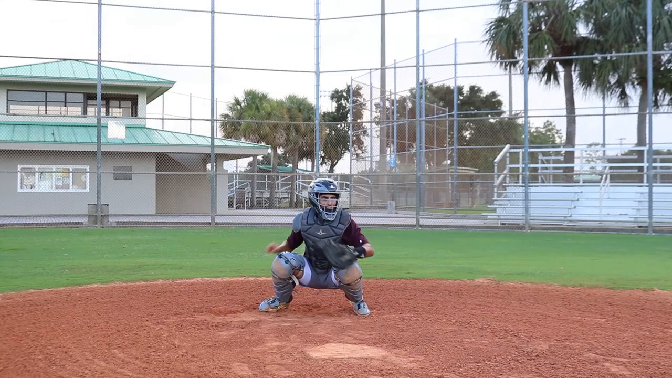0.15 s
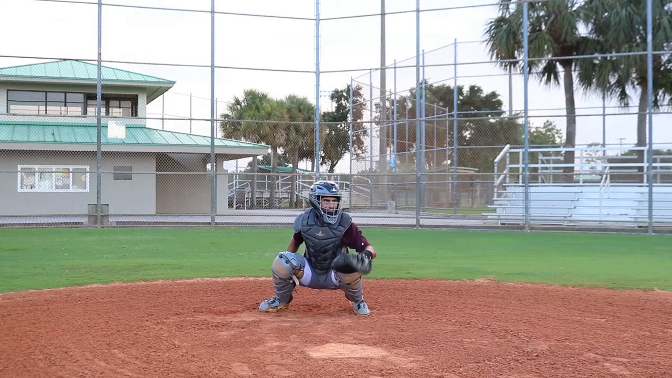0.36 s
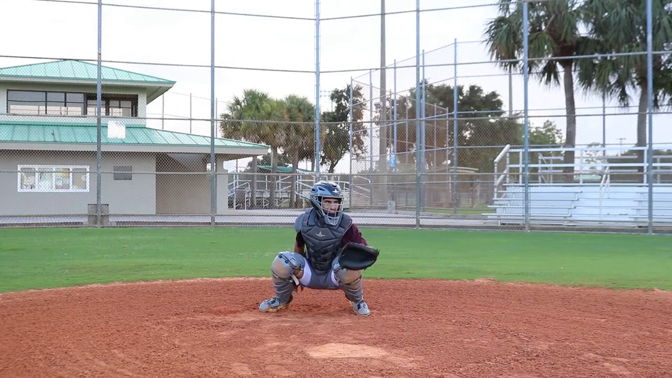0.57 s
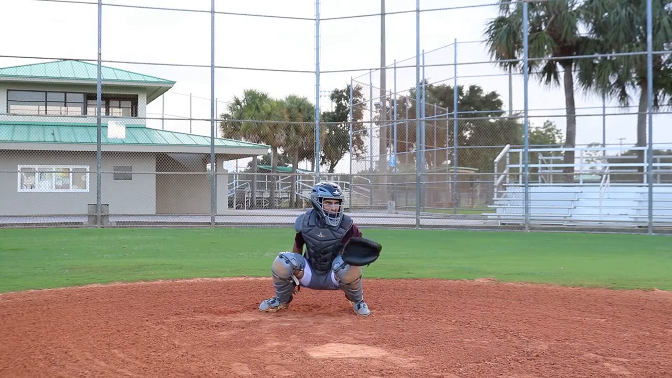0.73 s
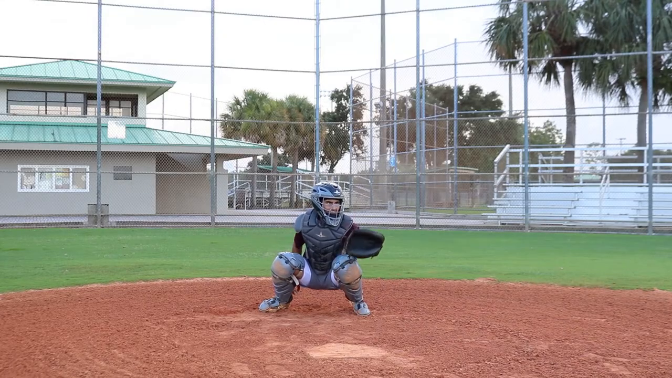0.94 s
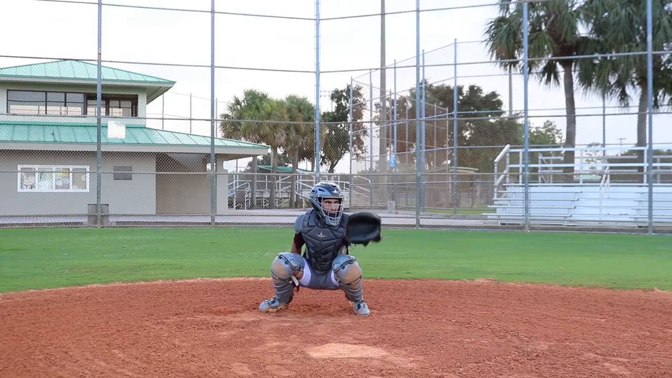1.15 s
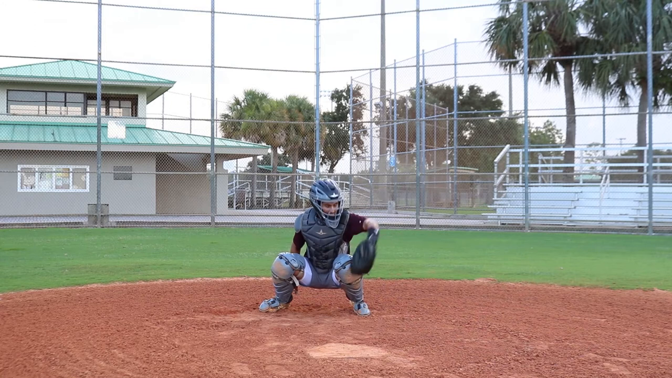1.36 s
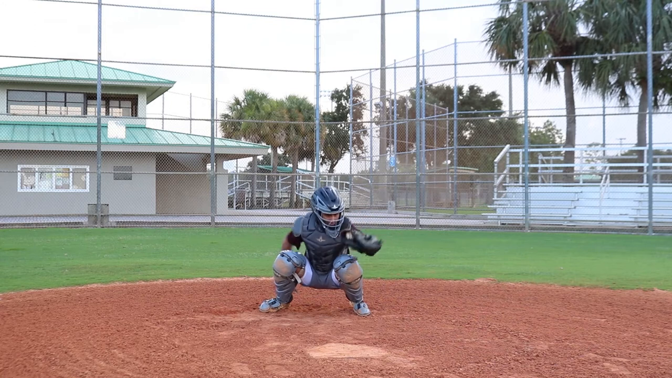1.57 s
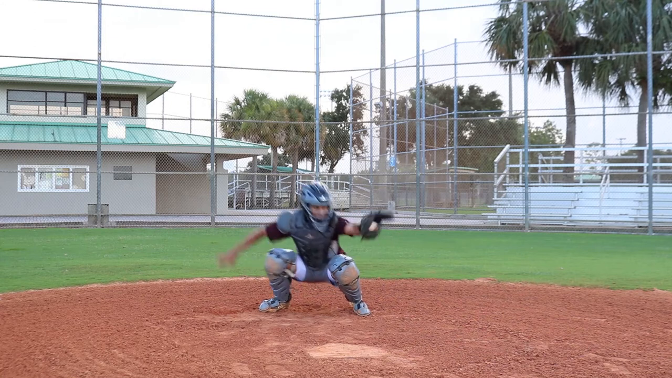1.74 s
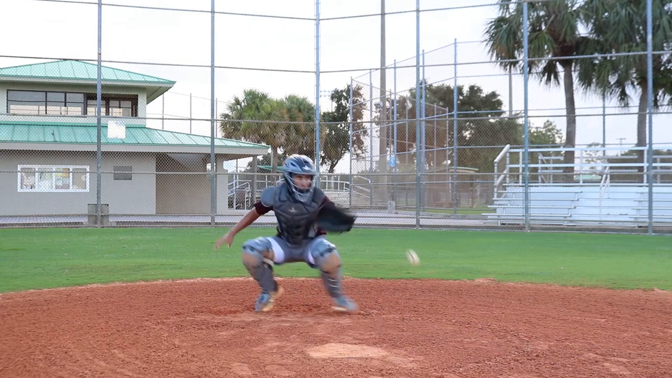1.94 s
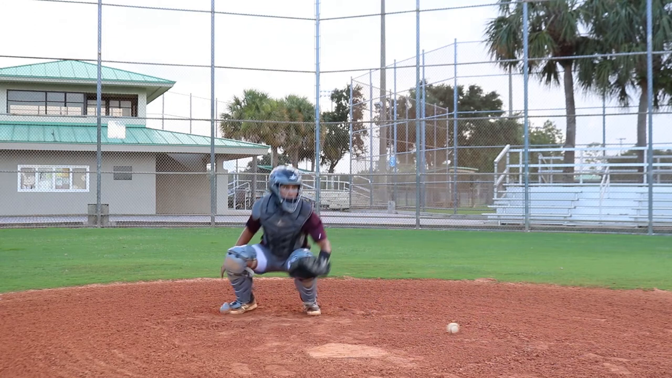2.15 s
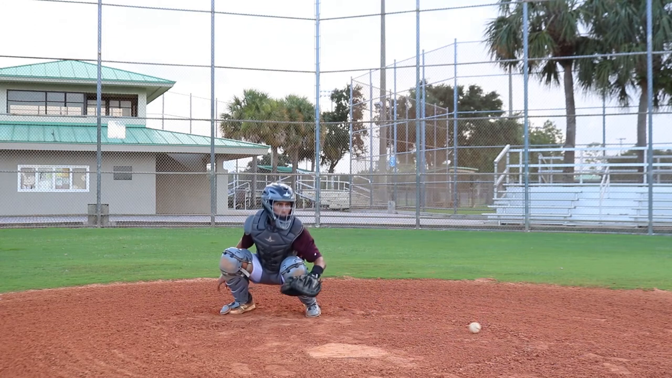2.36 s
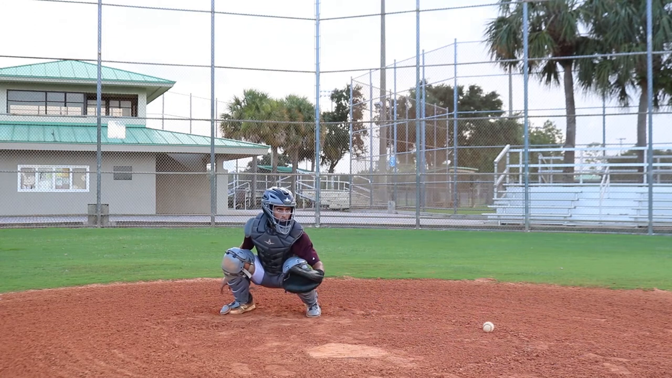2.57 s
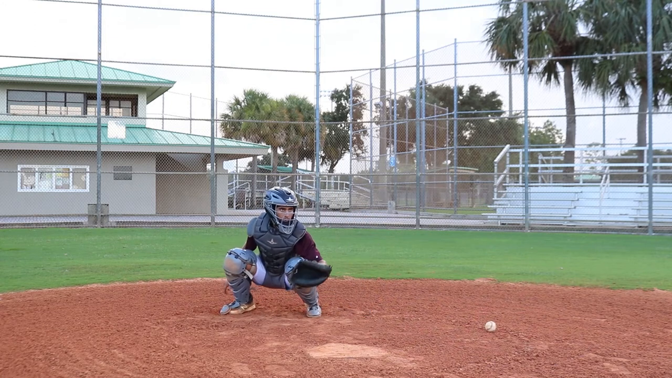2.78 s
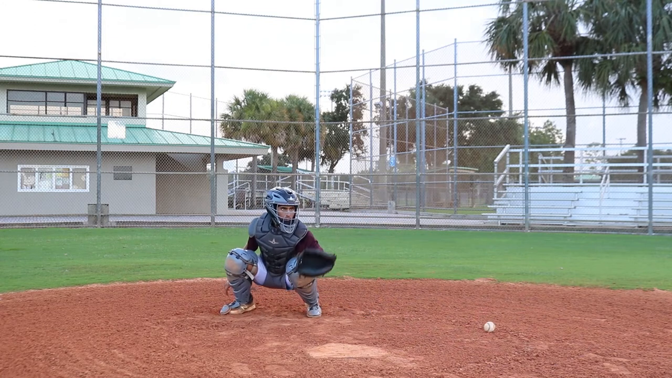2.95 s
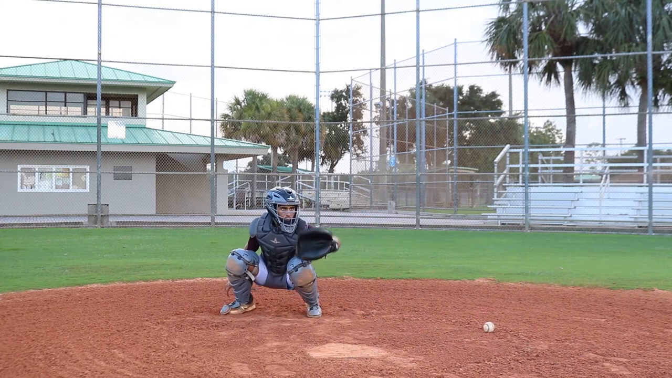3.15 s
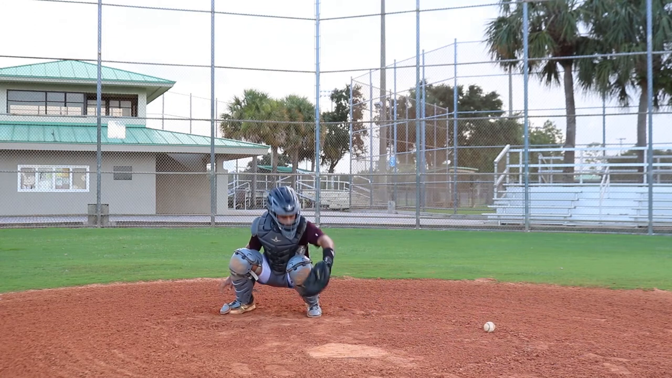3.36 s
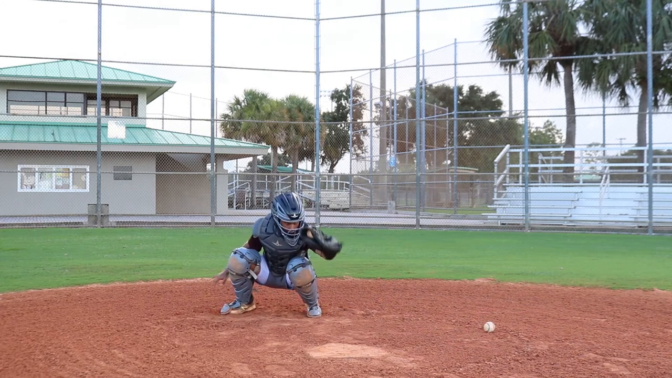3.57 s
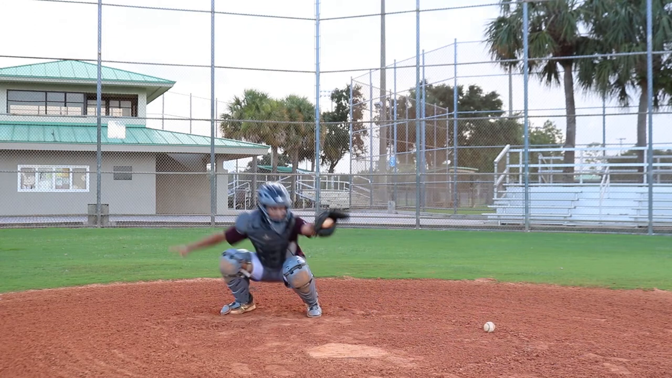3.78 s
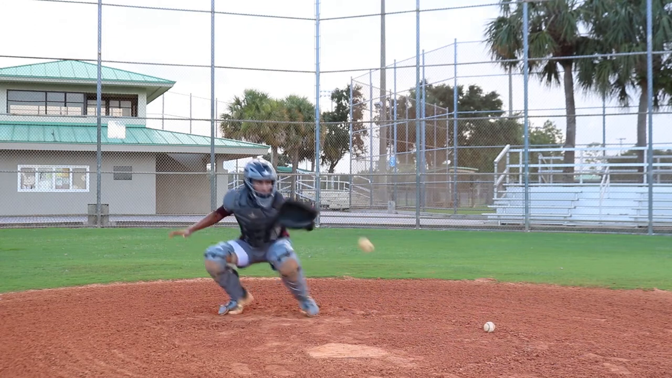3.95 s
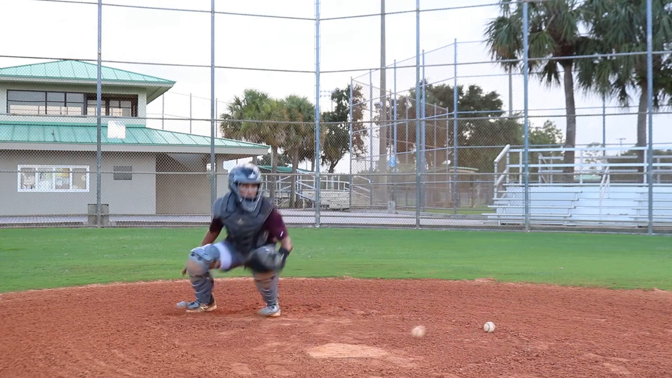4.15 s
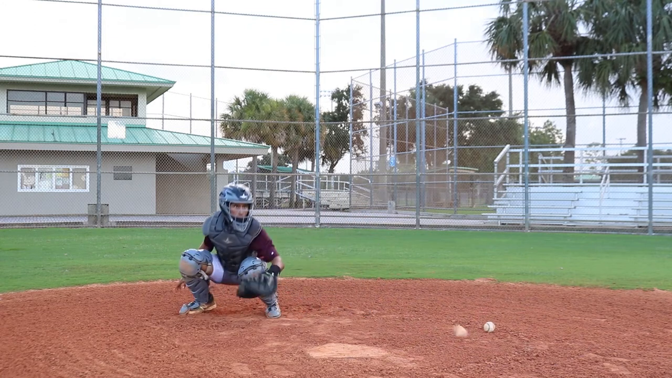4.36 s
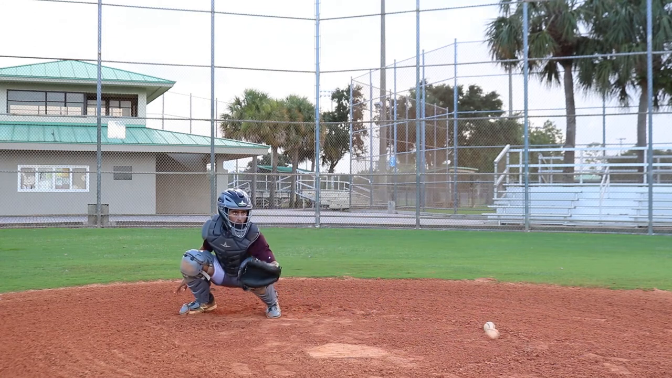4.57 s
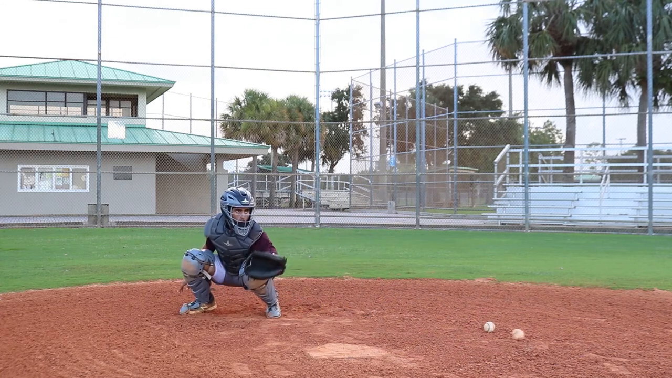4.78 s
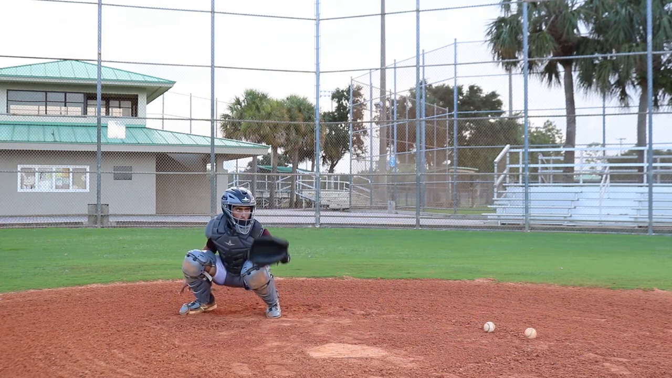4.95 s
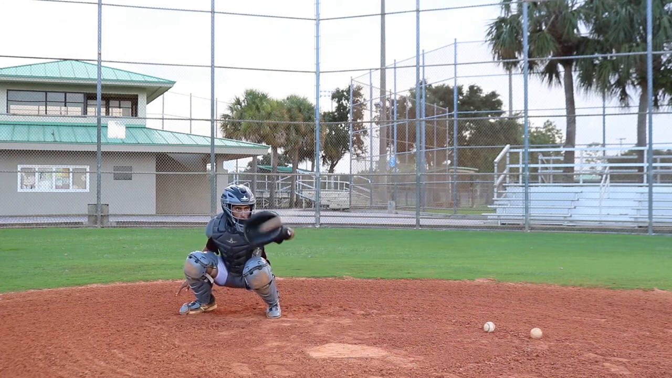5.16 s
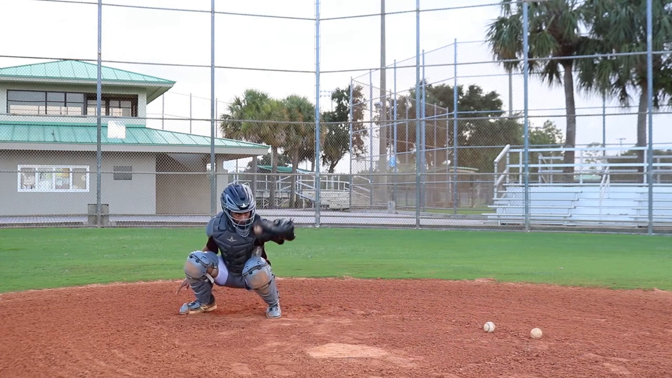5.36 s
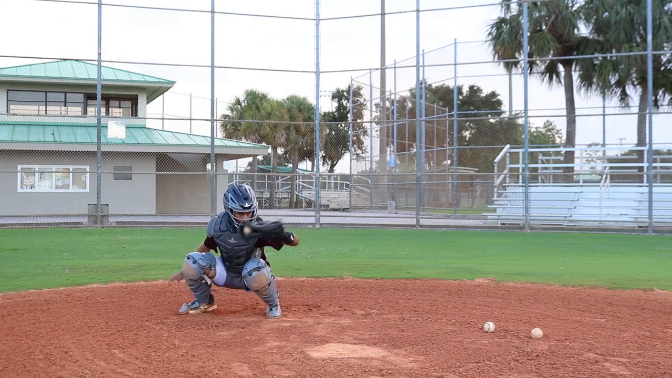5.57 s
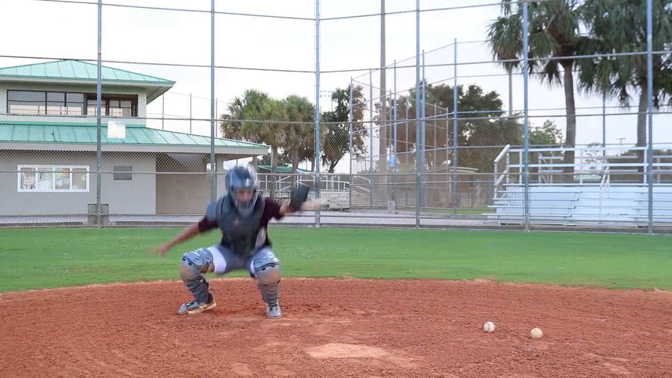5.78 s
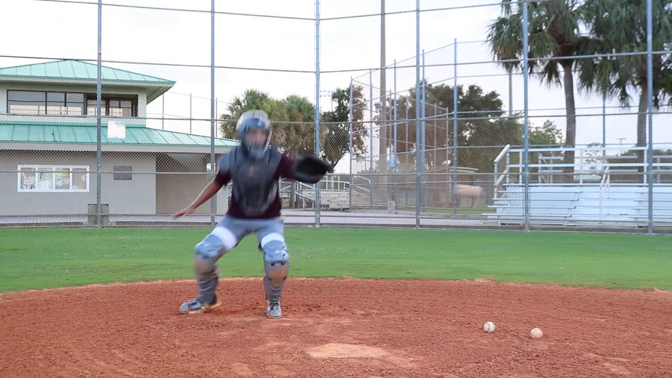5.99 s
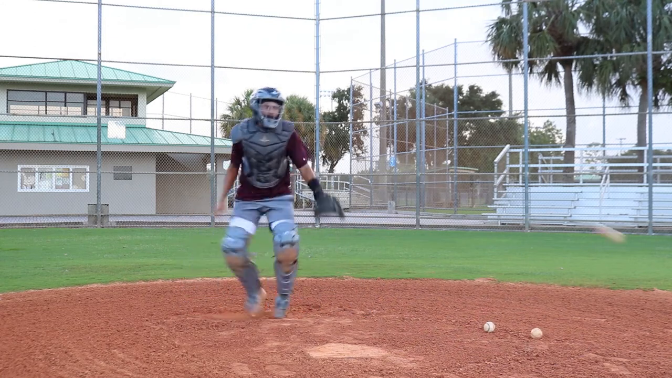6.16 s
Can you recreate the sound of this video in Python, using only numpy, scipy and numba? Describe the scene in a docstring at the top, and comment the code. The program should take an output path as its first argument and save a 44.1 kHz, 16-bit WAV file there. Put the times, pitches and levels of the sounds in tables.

```python
"""On an open ball field a small bird calls over distant traffic and a low rumble. A pitch hisses in and
pops in the catcher's mitt, overloading the microphone, whose limiter ducks; ground, fences and buildings
throw the pop back. His gear clicks and his feet thud and scuff on the clay. Two more pitches follow,
about two seconds apart; between them the bird calls again and he drops the ball. A last scuff ends it."""
import sys
import numpy as np
from scipy import signal
from scipy.fft import rfft, irfft
from scipy.io import wavfile
from numba import njit

SR = 44100
rng = np.random.default_rng(int(sys.argv[2]) if len(sys.argv) > 2 else 0)


def transcribe(signal):
    """Save signal, clipped to [-1, 1], as a 16-bit WAV file at the path in sys.argv[1]."""
    frames = np.atleast_2d(signal).T
    limited = np.clip(frames, -1, 1)
    pcm = np.round(limited * 32767).astype(np.int16)
    wavfile.write(sys.argv[1], SR, pcm)


N = 274302
T = np.arange(N) / SR

# catches: start_s, level_db, crack_db, leather modes set by where the ball lands (pitch_hz, level_db),
# sent_to_walls_db, rumble_hold_s
CATCHES = [ (1.3929, 2, 0, [(620, 4.5), (1290, 5), (1700, 5.5), (2150, 4), (2850, -1.5)], -4.5, 0.94),
           (3.3613, 2.6, -1, [(535, 2.5), (720, -8), (1700, 0), (2000, -1), (2450, 4.5), (2900, -1)],
           -1.5, 1.14), (5.246, 6, -2.5, [(500, -11), (930, 5), (1130, 2.5), (1590, 4.5), (2900, -7.5),
           (3900, -2)], -5.5, .42)]
# spectrum of sandy clay, also used for the bird's echo: frequency_hz, level_db
GRIT = [(1000, 4), (3000, -5.5), (5500, -4), (7000, -7), (8800, 0.5), (10500, -19), (13500, -12),
        (16000, -19)]


def undb(db):
    """Amplitude ratio of a level in decibels."""
    return 10 ** (np.asarray(db) / 20)


def colour(x, spectrum):
    """Spectral shaping by (frequency_hz, level_db) points, keeping the power of white noise."""
    hz, db = np.transpose(spectrum)
    log_hz = np.log(np.fft.rfftfreq(len(x), 1 / SR) + 1)
    gain = undb(np.interp(log_hz, np.log(hz), db))
    return irfft(rfft(x) * gain / np.sqrt(np.mean(gain ** 2)), len(x))


def noise(spectrum):
    """Coloured Gaussian noise of rms near 1."""
    return colour(rng.standard_normal(N), spectrum)


def walk(rate_hz):
    """Random modulation: a line through rate_hz Gaussian values a second."""
    steps = rng.standard_normal(N // 8)
    return np.interp(T * rate_hz, np.arange(len(steps)), steps)


def band(x, hz, kind, order=2):
    """Maximally flat low-pass or high-pass filter."""
    return signal.sosfilt(signal.butter(order, hz, kind, fs=SR, output="sos"), x)


def resonate(x, hz, width_hz):
    """Second-order resonance with gain 1 at its centre."""
    return signal.lfilter(*signal.iirpeak(hz, hz / width_hz, fs=SR), x)


def decay(t, t60_s):
    """Exponential damping: gain 1 until t = 0, then 60 dB down every t60_s."""
    return np.exp(-np.log(1000) * np.maximum(t, 0) / t60_s)


def ring(modes):
    """Free vibration: a sum of damped modes (pitch_hz, level_db, t60_s)."""
    t = T[:SR // 4]
    return sum(undb(db) * decay(t, t60_s) * np.sin(2 * np.pi * hz * t) for hz, db, t60_s in modes)


def burst(spectrum, t60_s):
    """Impact noise: a sudden onset and an exponential decay, cut at a quarter second."""
    t = T[:SR // 4]
    return decay(t, t60_s) * colour(rng.standard_normal(len(t)), spectrum)


def add(out, start_s, x):
    """Superposition of x on out from start_s."""
    start = max(int(start_s * SR), 0)
    out[start:start + len(x)] += x[:N - start]


def traffic(level_db=-36.5, waver_db=0.8):
    """Many distant vehicles sum incoherently to an even wash."""
    spectrum = [(250, -2.5), (340, -8.5), (480, -19), (650, -11.5), (850, -6.5), (1150, -6.5), (1600, -12),
                (2100, -18.5), (3000, -27.5), (4500, -32.5), (7000, -36.5), (8700, -38.5), (11000, -41),
                (16000, -41.5)]  # far traffic: frequency_hz, level_db
    return band(noise(spectrum), 261, "high") * undb(level_db + waver_db * walk(5.4))


def rumble(rest_db=-38.5, swell_db=4.5, waver_db=1.0, lead_s=.58, rise_s=.65, fall_s=.32):
    """Amplitude-modulated low noise that swells before each catch, holds and sinks."""
    spectrum = [(20, -7.5), (35, -23), (58, -0.5), (95, -4.5), (128, 2), (160, -2.5), (250, -6.5),
                (330, -20), (500, -21.5), (1000, -61)]  # the rumble: frequency_hz, level_db
    swell = 0
    for start_s, *_, hold_s in CATCHES:
        rising = (T - start_s + lead_s) / rise_s
        falling = 1 - (T - start_s - hold_s) / fall_s
        swell += np.clip(np.minimum(rising, falling), 0, 1)
    return noise(spectrum) * undb(rest_db + swell_db * swell + waver_db * walk(14))


def bird(rise_hz=130, waver_hz=25, echo_db=-11):
    """Frequency-modulated whistles rise a little and drop at the end; trees add faint reverberation."""
    chirps = [(.003, .101, 7200, 480, -41), (.309, .028, 7130, 450, -51), (3.397, .046, 6720, 330, -43),
              (3.595, .06, 6810, 70, -53), (4.877, .028, 7080, 150, -54), (5.187, .038, 7160, 220, -49)]  # calls: start_s, length_s, top_hz, fall_hz, level_db
    calls, waver = np.zeros(N), waver_hz * walk(120)
    for start_s, length_s, top_hz, fall_hz, db in chirps:
        progress = np.linspace(0, 1, int(length_s * SR))
        hz = top_hz - rise_hz * (1 - progress) ** 4 - fall_hz * progress ** 7
        hz += waver[int(start_s * SR):][:len(hz)]
        swell = np.sqrt(np.abs(np.sin(np.pi * progress ** 2)))
        add(calls, start_s, undb(db) * swell * np.sin(2 * np.pi * np.cumsum(hz) / SR))
    trees = burst(GRIT, t60_s=0.52)
    return calls + undb(echo_db) * signal.fftconvolve(calls, trees / np.linalg.norm(trees))[:N]


def clicks():
    """Impacts of gear and grit: a harder contact is shorter and excites the plastic's modes more."""
    # contacts: start_s, level_db, hardness (0 a crunch of grit, 1 a snap of plastic)
    contacts = [(1.4390, -17.5, 0.57), (1.825, -30, 0.81), (2.144, -30, 0), (2.1828, -31, 0.3),
                (3.3587, -23.5, 0.72), (3.8647, -31, 1), (4.1900, -36, .3), (4.2244, -32, 1),
                (4.26, -39, .15), (4.456, -39, 0.5), (6.188, -40.5, 0.8)]
    plastic = [(2400, -1, 0.0049), (3490, -7.5, 0.01), (4060, -5, 0.0068), (4970, -13.5, 0.011)]  # modes of the hard gear: pitch_hz, level_db, t60_s
    out = np.zeros(N)
    for start_s, db, hardness in contacts:
        t60_s = np.interp(hardness, (0, 1), (.022, .0064))
        plastic_db = np.interp(hardness, (0, 1), (-15, 9))
        crunch = undb(-4) * burst(GRIT, t60_s)
        add(out, start_s, undb(db) * (crunch + undb(plastic_db) * ring(plastic)))
    return out


def thuds():
    """Feet and the dropped ball strike the clay, each exciting one low damped mode."""
    impacts = [(1.646, -25.5, 100, 0.3), (1.745, -24, 85.5, 0.25), (2.095, -20, 118, 0.058),
               (2.3, -29.5, 134, 0.079), (3.775, -23, 115, 0.12), (4.197, -21, 126, 0.13),
               (4.2261, -12, 340, 0.012), (4.55, -23.5, 125.6, 0.27), (5.57, -24.5, 130, 0.22),
               (6.19, -24, 113, 0.23)]  # blows on clay: start_s, level_db, pitch_hz, t60_s
    out = np.zeros(N)
    for start_s, db, hz, t60_s in impacts:
        add(out, start_s, ring([(hz, db, t60_s)]))
    return out


def scuffs(grain_db=1.65):
    """Sliding friction of shoes on grit makes short swells of grainy noise."""
    slides = [(2.0, -57, 0.074), (2.136, -52.5, 0.055), (4.184, -54.5, 0.11), (6.11, -48.5, 0.038)]  # shoe slides: middle_s, level_db, half_length_s
    swell = sum(undb(db) * np.exp(-((T - middle_s) / half_s) ** 2) for middle_s, db, half_s in slides)
    return swell * noise(GRIT) * undb(grain_db * walk(400))


def flight(level_db=-51.5, flutter_db=1.2, lead_s=.21, rise_s=.091, fade_s=.2):
    """Flow noise of the spinning ball peaks as it passes the microphone and fades towards the mitt."""
    spectrum = [(1500, 2), (3000, 2), (5500, 5.5), (7000, 3.5), (8800, 4.5), (10500, -4.5), (13000, -5),
                (16000, -31)]  # air around the ball: frequency_hz, level_db
    swell = 0
    for catch_s, *_ in CATCHES:
        since_peak = T - catch_s + lead_s
        width_s = np.where(since_peak < 0, rise_s, fade_s)
        swell += np.exp(-(since_peak / width_s) ** 2) * (T < catch_s)
    return undb(level_db) * swell * noise(spectrum) * undb(flutter_db * walk(60))


def scatter_envelope(t, fence_delay_s=.09, rise_s=.022, hold_s=.096, sag_db_per_s=126):
    """Longer paths arrive later: t seconds after a pop, ground, then fences, then a faint far tail."""
    ground = undb(-23) * (t > 0) * decay(t, t60_s=.15)
    late = t - fence_delay_s
    fences = undb(-28.5 - sag_db_per_s * np.maximum(late, 0)) * decay(late - hold_s, t60_s=.2)
    tail = undb(-43.5) * decay(late, t60_s=1.6)
    onset = np.clip(1 + late / rise_s, 0, 1)
    return ground + onset * np.hypot(fences, tail)


def scatter(grain_db=3.5, patchy_db=1.8):
    """Diffuse reflection from ground, fences and bleachers follows each pop as a grainy wash."""
    spectrum = [(100, -38), (300, 11), (520, 0.5), (850, -2.5), (1500, -4.5), (2300, -8), (4000, -14),
                (7000, -19), (8800, -16), (10500, -29.5), (13500, -32), (16000, -39)]  # scattered sound: frequency_hz, level_db
    envelope = sum(scatter_envelope(T - start_s) for start_s, *_ in CATCHES)
    facets = rng.standard_normal(N) * undb(grain_db * walk(2500) + patchy_db * walk(160))
    return envelope * colour(facets / np.std(facets), spectrum)


def wall_echoes(pops):
    """Specular reflection: two walls return each pop delayed, dulled and with a hollow resonance."""
    walls = [(0.151, -20, 1220, 420, -10.5), (0.168, -23, 1690, 350, -26.5)]  # reflectors: delay_s, level_db, treble_edge_hz, ring_hz, ring_db
    times_s, *_, sent_db, _ = zip(*CATCHES)
    sent = pops * undb(np.interp(T, times_s, sent_db))
    out = np.zeros(N)
    for delay_s, db, edge_hz, ring_hz, ring_db in walls:
        dulled = band(sent, edge_hz, "low", order=1)
        hollow = resonate(band(sent, 530, "low"), ring_hz, width_hz=300)
        add(out, delay_s, undb(db) * dulled + undb(ring_db) * hollow)
    return out


def mitt(ring_t60_s=.012, seat_s=.0029, seat_db=-1.5):
    """Impact excitation: the leather cracks and rings; the pocket booms, and again as the ball seats."""
    pocket_modes = [(345, 0, .017)]  # the mitt's pocket: pitch_hz, level_db, t60_s
    crack_spectrum = [(300, -15), (1200, -6), (2500, -5), (4000, 2.5), (5900, -4), (7000, -8), (8500, -2),
                      (10500, -9), (12700, -5), (16000, -15)]  # crack of the leather: frequency_hz, level_db
    out, pocket = np.zeros(N), ring(pocket_modes)
    for start_s, db, crack_db, leather, *_ in CATCHES:
        # higher modes die sooner
        slap = ring([(hz, mode_db, ring_t60_s * (hz / 1200) ** -.4) for hz, mode_db in leather])
        crack = undb(crack_db) * burst(crack_spectrum, t60_s=.008)
        add(out, start_s, undb(db) * (pocket + slap + crack))
        add(out, start_s + seat_s, undb(db + seat_db) * band(pocket, 450, "low"))
    return band(out, 185, "high")  # so small a source radiates little bass


def scene():
    """All sources superpose at one microphone, the same in both channels."""
    pops = mitt()
    mono = pops + scatter() + wall_echoes(pops) + flight()
    mono += clicks() + thuds() + scuffs()
    mono += bird() + rumble() + traffic()
    return np.array([mono, mono])


@njit
def limiter(x, threshold, attack_s, hold_s, release_s):
    """Feed-forward gain control: the gain sinks after an overload, holds, then springs back."""
    gain, cut, target, wait_s = np.empty(len(x)), 0., 0., 0.
    for i in range(len(x)):
        if abs(x[i]) > threshold:
            excess = np.log(abs(x[i]) / threshold)
            if excess > target:
                target, wait_s = excess, hold_s
        wait_s -= 1 / SR
        if wait_s < 0:
            target = 0.
        cut += (target - cut) / (SR * (attack_s if target > cut else release_s))
        gain[i] = np.exp(-cut)
    return gain


def record(dry, top_hz=15750):
    """Hard clipping flattens the pops, too fast for the limiter, which then briefly ducks the field."""
    gain = limiter(dry[0], threshold=1.4, attack_s=.0028, hold_s=.089, release_s=.0034)
    clipped = np.clip(dry * gain, -1, 1)
    steep_low_pass = signal.ellip(8, .2, 70, top_hz, fs=SR, output="sos")
    return signal.sosfilt(steep_low_pass, clipped)


dry = scene()
out = record(dry)
transcribe(out)
```